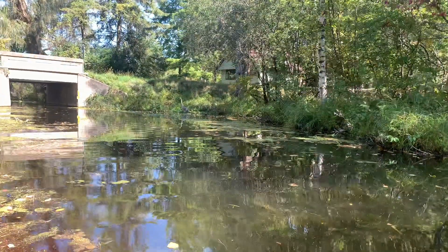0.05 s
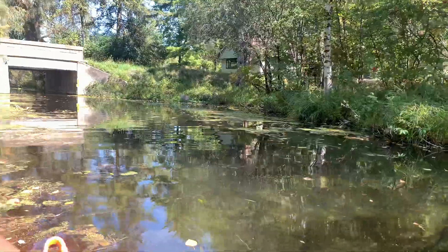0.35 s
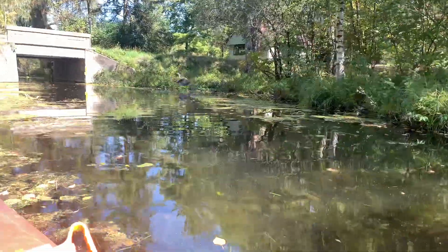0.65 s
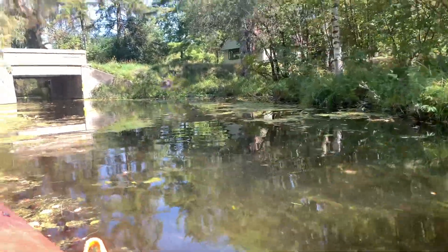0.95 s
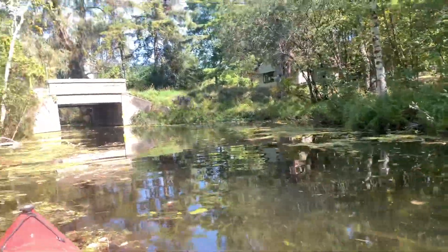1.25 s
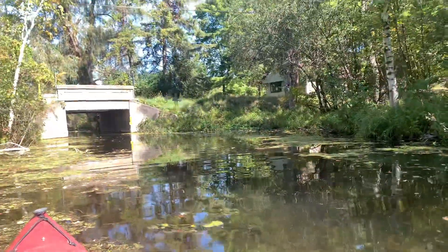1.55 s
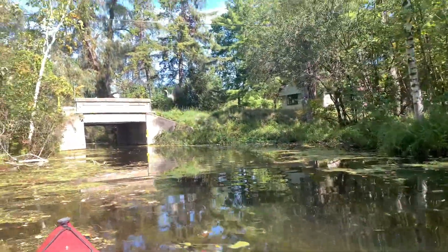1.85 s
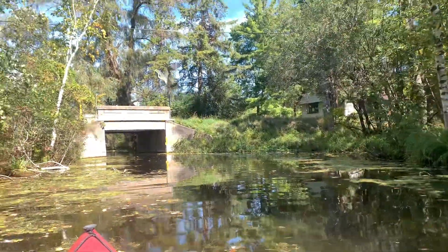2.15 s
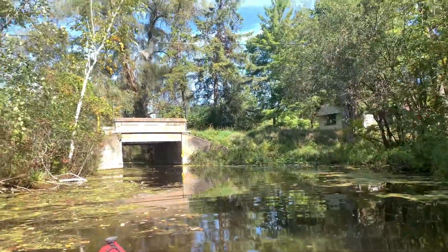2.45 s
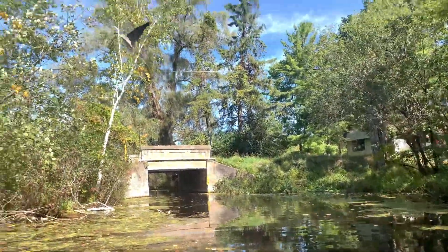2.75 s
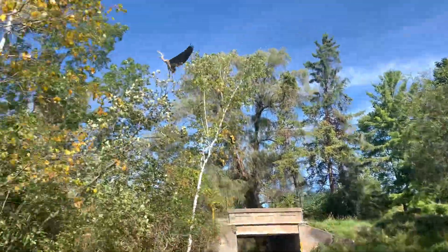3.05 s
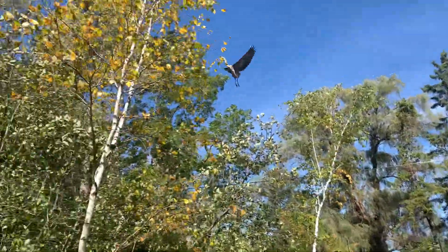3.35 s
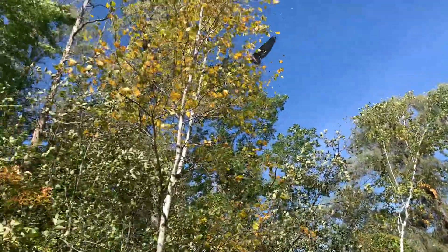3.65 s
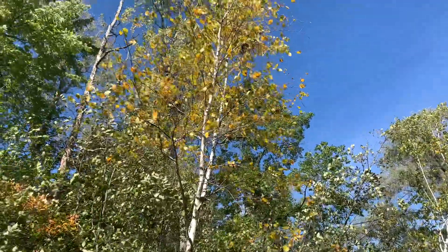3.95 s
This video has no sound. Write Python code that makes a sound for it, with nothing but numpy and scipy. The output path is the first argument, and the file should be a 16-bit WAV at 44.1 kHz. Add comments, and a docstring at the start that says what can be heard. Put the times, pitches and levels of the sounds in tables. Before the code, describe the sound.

A large bird gives seven hoarse, echoing caws, roughly one every 0.6 seconds, the last fainter at 3.6 seconds. Water and leaves hiss softly, with a faint pulsing insect. A paddle swishes and drips around 1 second; the kayak knocks at 0.6, 1.5 and 2.7 seconds. Wind buffets the microphone, stronger from about 1.7 seconds. Two soft, distant hoots come near the end.

```python
"""A hoarse caw sounds over the hiss of a slow river: the first of seven from a large bird in the trees.
Each is a harmonic tone, roughened by modulation, shaped by the throat and scattered by the woods.
At the listener's kayak a paddle stroke swishes and drips, the hull knocks and rattles in its modes,
and the eddies of a rising wind buffet the microphone.
Behind them lie a faint pulsing insect and, near the end, two soft far hoots."""
import sys
import numpy as np
from scipy import signal
from scipy.fft import rfft, irfft
from scipy.io import wavfile
from scipy.ndimage import uniform_filter1d

SR = 44100
rng = np.random.default_rng(int(sys.argv[2]) if len(sys.argv) > 2 else 0)


def output_pcm(signal):
    """Save a mono or channel-first signal as 16-bit PCM at the path in sys.argv[1].

    Samples are clipped to [-1, 1] before scaling.
    """
    pcm = np.clip(np.atleast_2d(signal).T, -1, 1) * 32767
    wavfile.write(sys.argv[1], SR, np.round(pcm).astype(np.int16))


N = 176400
TIME = np.arange(N) / SR

# hiss of leaves and water: f/Hz, density/dB
HISS_SPECTRUM = [(500, -25), (900, 1.5), (1500, 2), (4500, -1), (7000, -3), (8500, -10), (10300, -14),
                 (12500, -26), (15500, -19)]
# its correlation between the ears: f/Hz, coefficient (clipped to -1..1 in use)
HISS_CORRELATION = [(7000, -0.086), (9000, -1.38), (10500, 1), (14000, -1.1)]
# its envelope: t/s, level/dB
HISS_ENVELOPE = [(0, -56), (1.2, -55.5), (2.3, -56.5), (4, -52.5)]
# low wash of the river: f/Hz, density/dB
WASH_SPECTRUM = [(400, 0.5), (750, -6.5), (1100, -35), (2000, -76)]
# insect rasp: f/Hz, density/dB
INSECT_SPECTRUM = [(5000, -27), (10000, 22.5), (12500, 13.5), (14000, -1)]
# hoots: t/s, duration/s, top f/Hz, level/dB, relative octave level/dB, fractional pitch bend
HOOT_NOTES = [(3.354, 0.36, 641, -57.5, -14, 0.0396), (3.845, 0.062, 274, -42, -9, 0.19)]
# knocks, gurgles and drips: t/s, level/dB, f/Hz, swell time/s
KNOCKS_AND_DRIPS = [(.095, -51.5, 870, 0.0064), (0.591, -28.5, 416, 0.0012), (.745, -40, 1030, 0.0025),
                    (.822, -41, 754, 0.0048), (0.915, -47, 595, 0.0038), (1.006, -39, 520, 0.0022),
                    (0.951, -41, 3420, 0.0009), (1.001, -37.5, 1180, 0.0021), (1.018, -39, 1020, 0.0017),
                    (1.021, -41, 3900, 0.0015), (1.039, -38, 1120, 0.003), (1.069, -42.5, 977, 0.0035),
                    (1.117, -44, 937, 0.0026), (1.153, -30, 4260, 0.00012), (1.209, -47.5, 3320, 0.0013),
                    (1.534, -43.5, 5900, .0007), (2.672, -25, 334, 0.0032)]
# gear striking the hull: t/s, level/dB
HULL_IMPACTS = [(1.4954, -39), (1.501, -35.5), (1.508, -39), (1.5149, -32)]
# hull modes: f/Hz, gain/dB, T60/s
HULL_MODES = [(509, 1.5, 0.028), (1090, -4.5, 0.014), (1670, -4, 0.015), (2370, -4.5, 0.019),
              (2880, -1.5, 0.03), (4520, -5.5, 0.015), (5600, -6, .008)]
# thin ticks: t/s, level/dB
HIGH_TICKS = [(0.134, -51.5), (2.055, -55)]
# paddle: peak t/s, rise/s, fall/s, swish level/dB, gurgle f/Hz, gurgle level/dB, spray level/dB
PADDLE_SURGES = [(0.774, 0.17, 0.23, -47, 650, -50.5, -61), (1.021, 0.039, 0.073, -43, 1032, -53.5, -54)]
# flow round the blade: f/Hz, density/dB
SWISH_SPECTRUM = [(900, 5), (2300, 2), (4000, -4), (7000, -7.5), (10000, -37)]
# wind on the microphone: t/s, level/dB
WIND_ENVELOPE = [(0.738, -59), (0.762, -40.5), (0.95, -36), (0.99, -71), (1.22, -39), (1.4, -36.5),
                 (1.6, -41.5), (1.72, -28.5), (1.85, -35.5), (2.19, -33.5), (2.25, -43.5), (2.35, -32),
                 (2.44, -33), (2.48, -37), (2.53, -30.5), (2.8, -28.5), (2.94, -37.5), (3.0, -30.5),
                 (3.44, -31.5), (3.52, -37.5), (4.0, -34)]
# its rumble: f/Hz, density/dB
RUMBLE_SPECTRUM = [(15, -61), (30, -13), (55, 4), (125, -8), (180, -18), (450, -41.5), (2000, -82)]
# its flutter: f/Hz, density/dB
FLUTTER_SPECTRUM = [(50, -12.5), (130, -1.5), (450, -14.5), (2000, -63.5)]
# single eddies: t/s, level/dB, initial f/Hz
EDDY_BUFFETS = [(0.859, -33, 197), (0.92, -27, 205), (1.328, -28.5, 131), (1.632, -25.5, 207),
                (1.654, -22.5, 185), (1.714, -23.5, 370), (1.878, -21.5, 123), (1.936, -23.5, 174),
                (2.091, -32.5, 256), (2.346, -20.5, 260), (2.357, -19, 290), (2.383, -25.5, 210),
                (2.526, -26, 424), (2.565, -28, 343), (2.583, -27.5, 262), (2.625, -23, 335),
                (2.678, -24.5, 196), (2.766, -29, 416), (2.816, -24, 104), (2.839, -38.5, 316),
                (2.861, -34.5, 337), (2.893, -33, 278), (3.059, -25.5, 238), (3.186, -20, 140),
                (3.343, -22.5, 90), (3.699, -31.5, 207)]
# reverberation of the woods: f/Hz, T60/s
WOODS_DECAY = [(300, 0.78), (1400, 0.72), (4000, 1), (10000, 0.13)]
# response of the bird's throat: f/Hz, gain/dB
THROAT_RESPONSE = [(500, -43), (750, -33), (1000, -17), (1230, -2), (1420, 1.5), (1650, -7), (1930, -11.5),
                   (2120, -19), (2400, -21), (2850, -35.5), (3450, -20), (4000, -31), (6000, -38)]
# caws: t/s, duration/s, gain/dB, top f/Hz, rattle f/Hz, left-right/dB, direct gain, treble gain/dB
CAW_CALLS = [(0.056, 0.25, -42.5, 689.7, 75, -0.5, 0.72, 1.5), (0.704, .22, -43, 710, 56.6, 0, 0.9, -1.5),
             (1.35, 0.25, -45, 693, 90, -3.5, 0.82, 4), (1.902, 0.26, -43, 712, 76, -1, 0.58, 5),
             (2.406, .25, -42, 726.4, 86, -9, 0.61, 4.5), (2.934, 0.28, -44.5, 694.7, 73, -20, 0.28, 4.5),
             (3.571, 0.25, -52, 652, 60, -7, 0.42, 11.5)]


def amp(db):
    """Amplitude ratio of a level in decibels."""
    return 10 ** (np.asarray(db) / 20)


def unit(x):
    """Normalisation to rms 1."""
    return x / np.sqrt(np.mean(x ** 2) + 1e-20)


def read(points, hz):
    """Interpolation on a log-frequency axis."""
    f, value = np.transpose(points)
    return np.interp(np.log(hz + 1), np.log(f + 1), value)


def level(points):
    """Amplitude envelope from rows of t/s, level/dB."""
    return amp(np.interp(TIME, *np.transpose(points)))


def add(mix, s, sound):
    """Superposition of a sound on the mix at time s."""
    part = mix[..., max(round(s * SR), 0):][..., :sound.shape[-1]]
    part += sound[..., :part.shape[-1]]


def colour(x, points):
    """Zero-phase filtering by rows of f/Hz, gain/dB."""
    size = x.shape[-1]
    return irfft(rfft(x) * amp(read(points, np.fft.rfftfreq(size, 1 / SR))), size)


def noise(points):
    """Gaussian noise of rms 1 with the given spectral shape."""
    return unit(colour(rng.standard_normal(N), points))


def noise_pair(points):
    """Uncorrelated noise for the two ears."""
    return np.array([noise(points), noise(points)])


def wander(hz):
    """Random fluctuation of rms 1, low-passed at hz."""
    lowpass = np.exp(-(np.fft.rfftfreq(N, 1 / SR) / hz) ** 2)
    return unit(irfft(rfft(rng.standard_normal(N)) * lowpass, N))


def plop(hz, swell_s):
    """A damped oscillation whose envelope peaks at swell_s."""
    t = np.arange(4000) / SR
    return t / swell_s * np.exp(1 - t / swell_s) * np.sin(2 * np.pi * hz * t)


def river():
    """Leaves and water give broadband noise, partly coherent between the ears, over a low wash."""
    left, independent = rfft(noise_pair(HISS_SPECTRUM))
    correlation = np.clip(read(HISS_CORRELATION, np.fft.rfftfreq(N, 1 / SR)), -1, 1)
    right = correlation * left + np.sqrt(1 - correlation ** 2) * independent
    hiss = irfft(np.array([left, right]), N)
    wash = 0.9 * noise(WASH_SPECTRUM) + 0.85 * noise_pair(WASH_SPECTRUM)
    return hiss * level(HISS_ENVELOPE) * amp(1.08 * wander(15)) + amp(-59.5) * wash


def insect():
    """Amplitude modulation: a high rasp comes in evenly spaced pulses of uneven strength."""
    first_s, period_s, width_s = .822, .2825, .052
    beats = first_s + period_s * np.arange(11)
    pulses = amp(3 * wander(38)) * sum(np.exp(-((TIME - s) / width_s) ** 2) for s in beats)
    left, independent = noise_pair(INSECT_SPECTRUM)
    return amp(-65) * pulses * np.array([left, 1.06 * independent - 0.25 * left])


def hoots():
    """Nearly pure tones: a fundamental and its weak octave arch in pitch and amplitude."""
    out = np.zeros(N)
    for s, length, hz, db, octave_db, bend in HOOT_NOTES:
        t = np.arange(0, length, 1 / SR)
        arch = np.sin(np.pi * t / length) ** 0.61
        pitch = hz * (1 - bend * (1 - arch) + 0.0099 * wander(40)[:len(t)])
        phase = 2 * np.pi * np.cumsum(pitch) / SR
        add(out, s, amp(db) * arch * np.sqrt(2) * (np.cos(phase) + amp(octave_db) * np.cos(2 * phase)))
    return out


def boat():
    """Damped vibration: knocks and drips ring briefly, gear excites the hull's modes, two ticks fizz."""
    out, t = np.zeros((2, N)), np.arange(3000) / SR
    attack_s, tick_s = 0.000099, 0.004
    for s, db, hz, swell_s in KNOCKS_AND_DRIPS:
        add(out, s, amp(db) * plop(hz, swell_s))
    onset = 1 - np.exp(-(t / attack_s) ** 2)
    for s, db in HULL_IMPACTS:
        for hz, mode_db, t60 in HULL_MODES:
            phase = 2 * np.pi * hz * rng.uniform(0.91, 1.05) * t + rng.normal(0, 1.0, (2, 1))
            add(out, s, onset * amp(db + mode_db - 60 * t / t60) * np.sin(phase))
    for s, db in HIGH_TICKS:
        fizz = noise([(5050, -20), (10100, 0)])[:2 * len(t)].reshape(2, -1)
        add(out, s, amp(db) * np.exp(-t / tick_s) * fizz)
    return out


def bubbles(centre_hz, spread, cycles, per_s=300):
    """Bubble resonance: a cloud of twelve pitches, scattered in place, rings at random times."""
    out = np.zeros((2, N))
    for hz in centre_hz * np.exp(spread * np.linspace(-1, 1, 12)):
        births = rng.random(N) < per_s / 12 / SR
        pops = births * amp(3 * np.minimum(rng.exponential(1, N), 4))
        out += signal.oaconvolve(pops, plop(hz, cycles / hz))[:N] * rng.uniform(0.11, 1, (2, 1))
    return unit(out)


def paddle():
    """Flow noise: the blade swishes through the water, stirs up bubbles and throws fine spray."""
    out = np.zeros((2, N))
    for s, rise, fall, db, gurgle_hz, gurgle_db, spray_db in PADDLE_SURGES:
        envelope = np.exp(np.minimum((TIME - s) / rise, (s - TIME) / fall))
        swish = amp(db) * noise_pair(SWISH_SPECTRUM)
        gurgle = amp(gurgle_db) * bubbles(gurgle_hz, spread=0.33, cycles=2.5)
        spray = amp(spray_db) * bubbles(centre_hz=3800, spread=0.44, cycles=1.3)
        out += envelope * (swish + gurgle + spray)
    return out


def wind():
    """Turbulent pressure on the microphone: gusts modulate a low rumble and a fitful flutter."""
    gust, eddies = wander(hz=14.8), noise(RUMBLE_SPECTRUM)
    envelope = uniform_filter1d(abs(signal.hilbert(eddies)), size=1000)
    evened = eddies / envelope ** .4
    rumble = unit(evened * amp(2.8 * gust)) + .14 * noise_pair(RUMBLE_SPECTRUM)
    flutter = noise(FLUTTER_SPECTRUM) + 0.1 * noise_pair(FLUTTER_SPECTRUM)
    flutter *= amp(31 * np.tanh(gust))
    return (rumble + amp(-16) * unit(flutter)) * level(WIND_ENVELOPE)


def buffets():
    """Pressure transients: single eddies snap on the microphone and sink in pitch."""
    out, t = np.zeros((2, N)), np.arange(4000) / SR
    end_hz, sag_s, swell_s, snap_hz = 60.2, 0.0064, 0.0057, 520
    envelope = t / swell_s * np.exp(1 - t / swell_s)
    for s, db, start_hz in EDDY_BUFFETS:
        hz = end_hz + (start_hz - end_hz) * np.exp(-t / sag_s)
        add(out, s, amp(db) * envelope * np.sin(2 * np.pi * np.cumsum(hz) / SR))
        snap_db = db + 3.5 + 20 * np.log2(start_hz / snap_hz)  # a higher start snaps harder
        snap = amp(snap_db) * plop(snap_hz, swell_s=0.00084)
        for ear in out:
            add(ear, s + rng.uniform(0, 0.0021), snap)
    return out


def woods(x):
    """Reverberation: trunks and banks scatter the sound, each band decaying at its own rate."""
    reflections_per_s, build_s = 2000, 0.0057
    taps = rng.standard_normal((2, SR)) * (rng.random((2, SR)) < reflections_per_s / SR)
    hz, t, bands = signal.stft(taps, SR, nperseg=256)
    decay = amp(-60 * t / read(WOODS_DECAY, hz)[:, None])
    tail = signal.istft(bands * np.minimum(t / build_s, 1) * decay, SR, nperseg=256)[1]
    return signal.fftconvolve(x[None], tail / np.linalg.norm(tail[0]), axes=1)[:, :N]


def caw(length, db, top_hz, rattle_hz, treble_db):
    """Source and filter: harmonics and rasp pass the throat; a rattle modulates pitch and amplitude."""
    rise_s, start_ratio, end_ratio = .075, .76, .69  # pitch arch, relative to top_hz
    attack_s, hold_s, fade_db, release_s = 0.034, 0.094, -11.5, 0.013
    t = np.arange(0, length, 1 / SR)
    n = len(t)
    early = np.maximum(1 - t / rise_s, 0)
    late = np.clip((t - rise_s) / (length - rise_s), 0, 1)
    arch = 1 - (1 - start_ratio) * early ** 1.6 - (1 - end_ratio) * late ** 0.97
    rattle_phase = 2 * np.pi * np.cumsum(rattle_hz * (1 + .25 * wander(53)[:n])) / SR
    jitter = (.015 + 0.026 * late) * wander(205)[:n]  # the voice breaks up as the caw falls
    hz = top_hz * arch * (1 + .04 * np.sin(rattle_phase) + jitter)
    phase = 2 * np.pi * np.cumsum(hz) / SR
    third_gain = amp(-8 * np.maximum(1 - (t / 0.13) ** 3, 0))  # the third harmonic comes in late
    harmonics = sum((third_gain if k == 3 else 1) * np.cos(k * phase) for k in range(1, 9))
    throat = [(f, gain_db + treble_db * (f > 1530)) for f, gain_db in THROAT_RESPONSE]
    rasp = amp(-14.5 + 10 * late) * noise(throat)[:n]
    voice = np.sqrt(2) * colour(harmonics, throat) + rasp
    attack = np.sin(np.pi / 2 * np.minimum(t / attack_s, 1)) ** 2
    fade = amp(fade_db * np.clip((t - hold_s) / (length - hold_s), 0, 1) ** 0.65)
    release = np.minimum((length - t) / release_s, 1)
    return amp(db) * attack * fade * release * (1 + .55 * np.cos(rattle_phase)) * voice


def bird(echo_s=0.14):
    """Multipath propagation: each caw arrives directly, off the far bank and through the woods."""
    direct, voice, echo = np.zeros((2, N)), np.zeros(N), np.zeros(N)
    for start, length, db, top_hz, rattle_hz, pan_db, direct_gain, treble_db in CAW_CALLS:
        sound = caw(length, db, top_hz, rattle_hz, treble_db)
        add(voice, start, sound)
        add(echo, start + echo_s, sound)
        add(direct, start, direct_gain * amp([[pan_db / 2], [-pan_db / 2]]) * sound)
    return direct + amp(-20) * echo + amp(-8) * woods(voice)


def scene():
    """Linear superposition of all sources."""
    return bird() + river() + wind() + buffets() + paddle() + boat() + hoots() + insect()


def record(dry):
    """Band limiting by a linear-phase low-pass filter."""
    cutoff_hz = 15800
    lowpass = signal.firwin(511, cutoff_hz, window=("kaiser", 9), fs=SR)
    return signal.oaconvolve(dry, lowpass[None], "same")


dry = scene()
out = record(dry)
output_pcm(out)
```